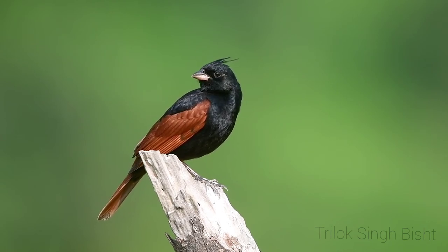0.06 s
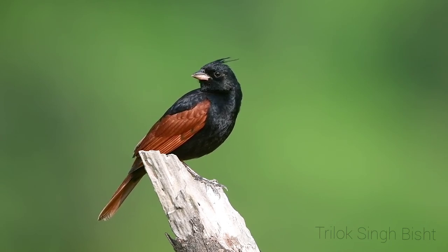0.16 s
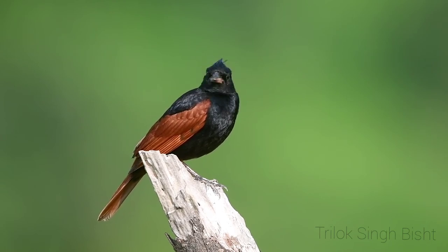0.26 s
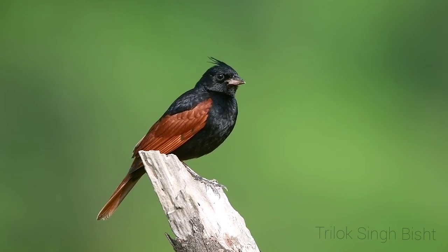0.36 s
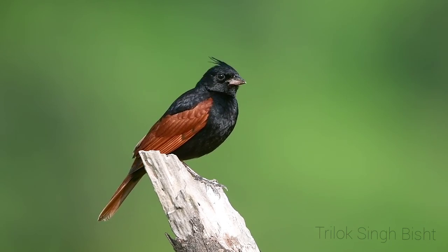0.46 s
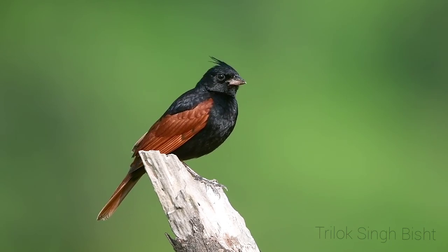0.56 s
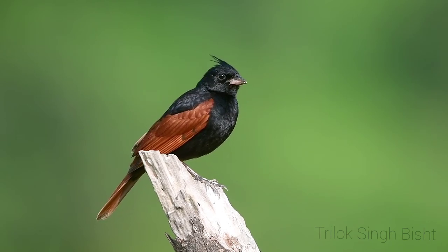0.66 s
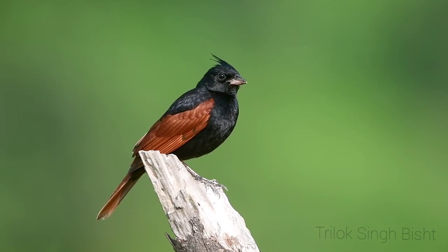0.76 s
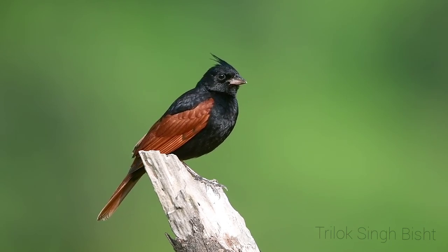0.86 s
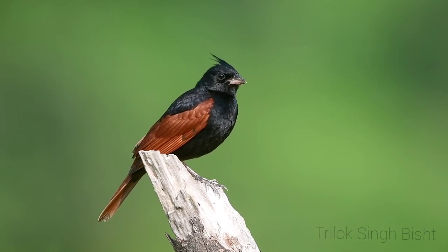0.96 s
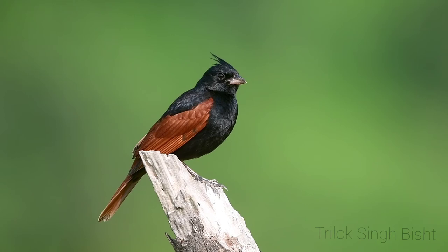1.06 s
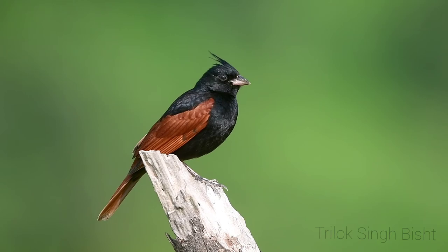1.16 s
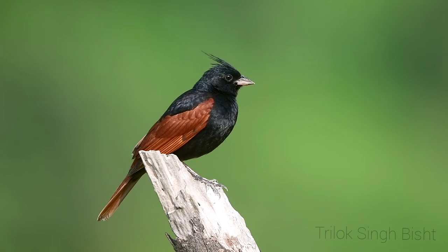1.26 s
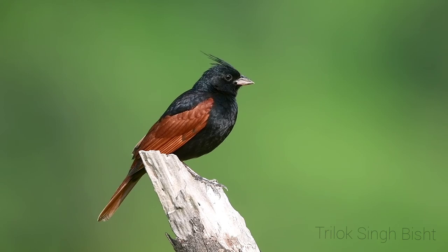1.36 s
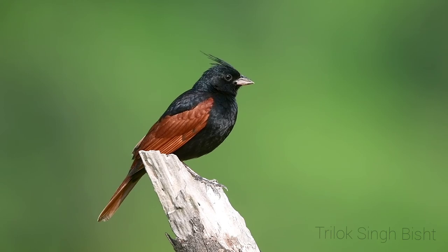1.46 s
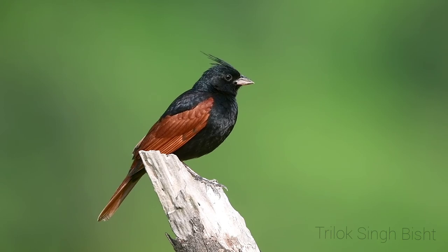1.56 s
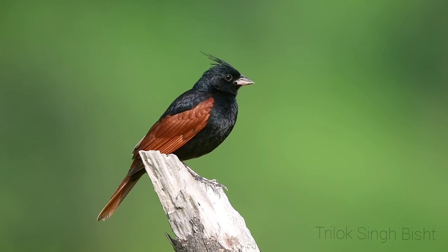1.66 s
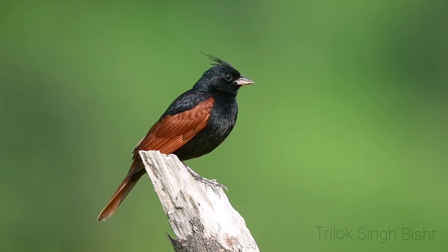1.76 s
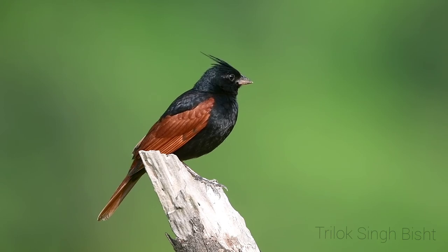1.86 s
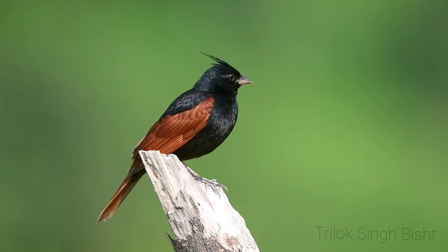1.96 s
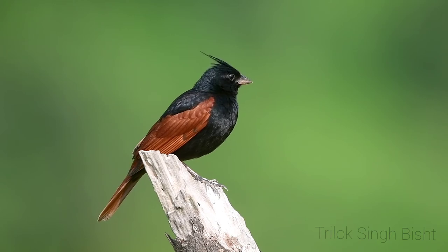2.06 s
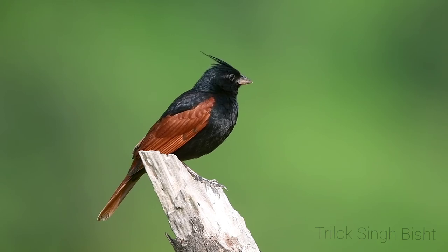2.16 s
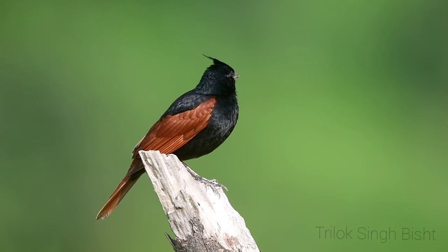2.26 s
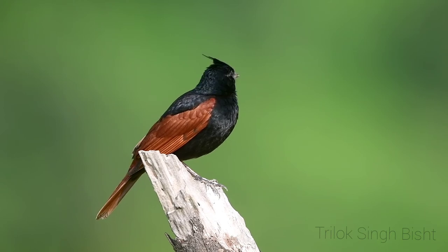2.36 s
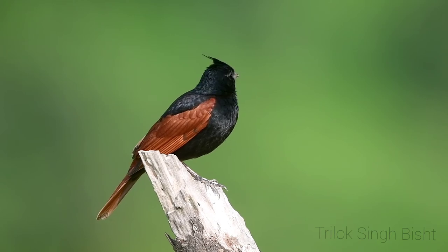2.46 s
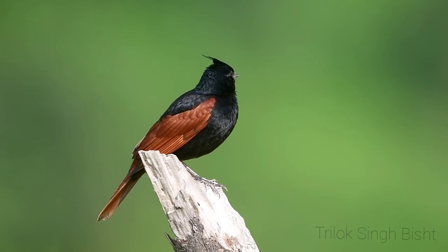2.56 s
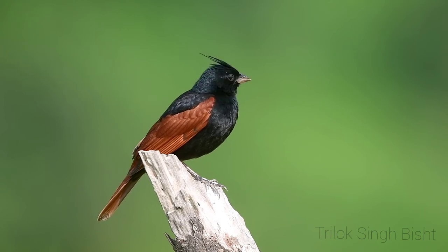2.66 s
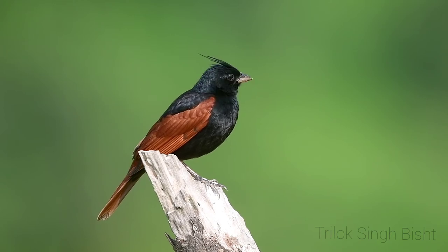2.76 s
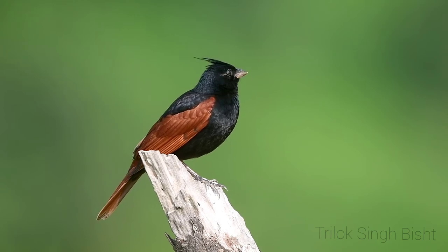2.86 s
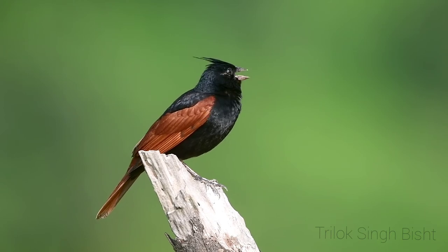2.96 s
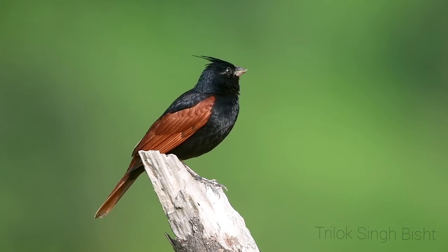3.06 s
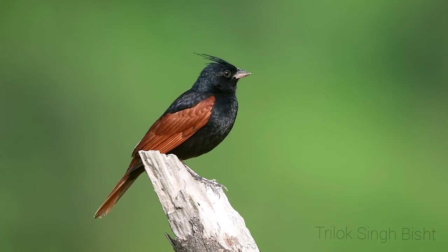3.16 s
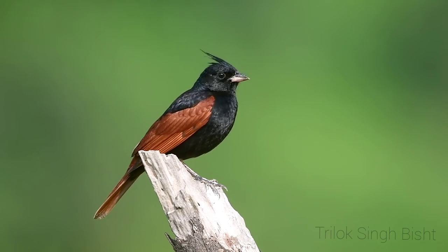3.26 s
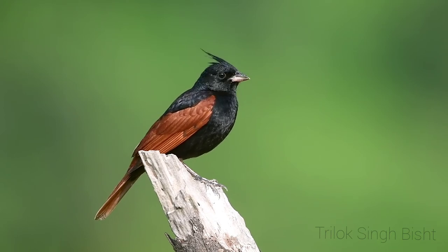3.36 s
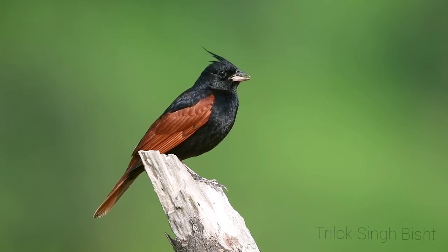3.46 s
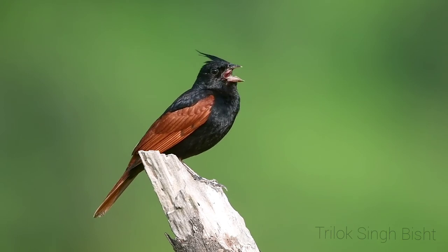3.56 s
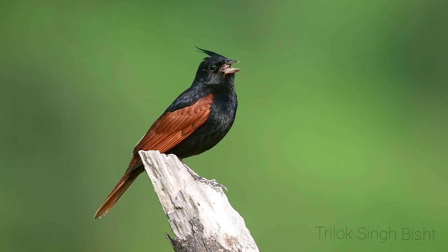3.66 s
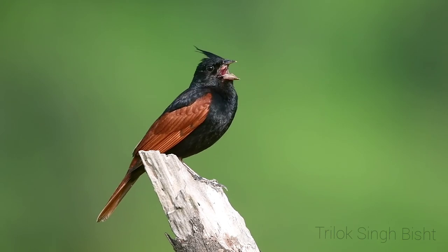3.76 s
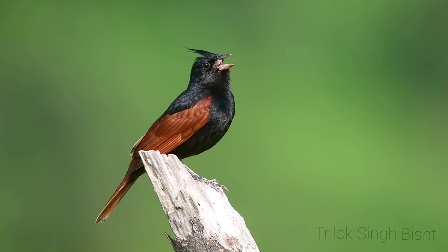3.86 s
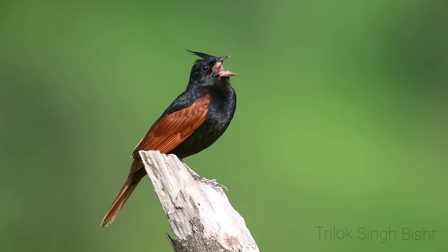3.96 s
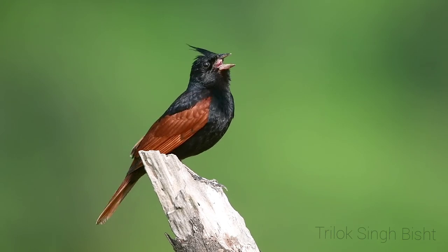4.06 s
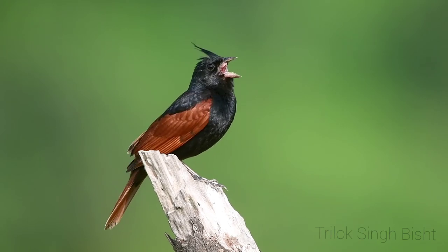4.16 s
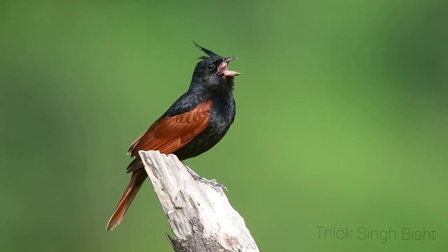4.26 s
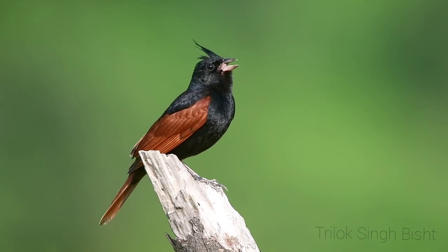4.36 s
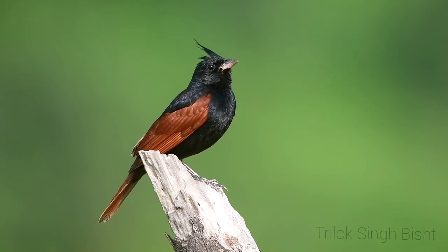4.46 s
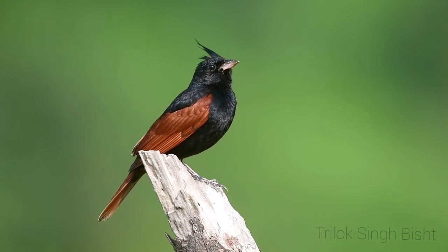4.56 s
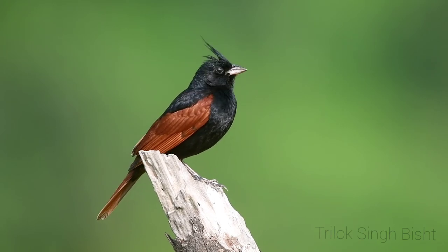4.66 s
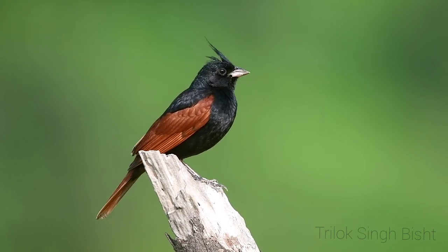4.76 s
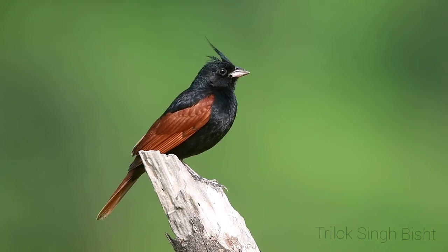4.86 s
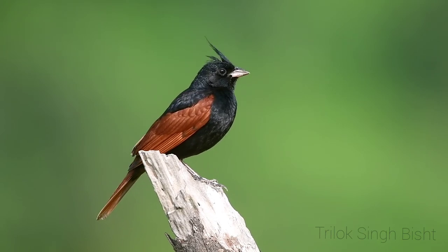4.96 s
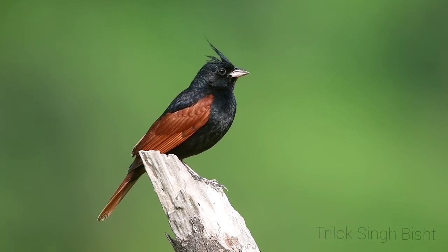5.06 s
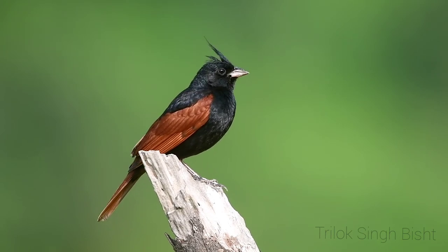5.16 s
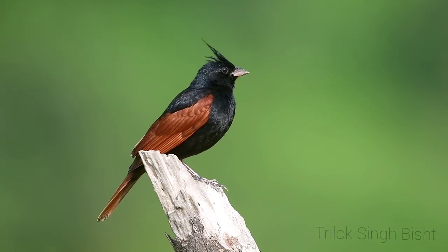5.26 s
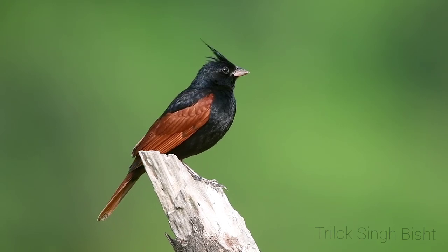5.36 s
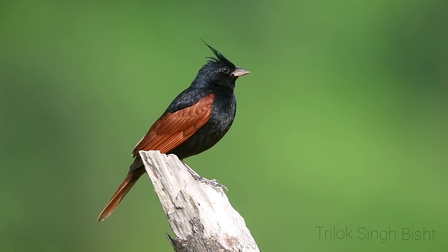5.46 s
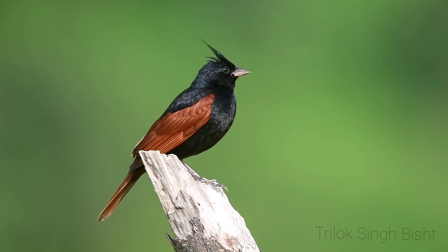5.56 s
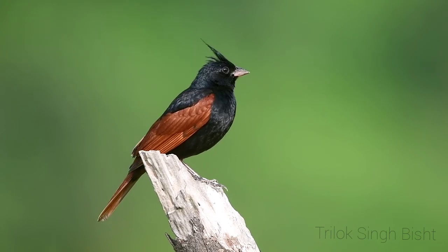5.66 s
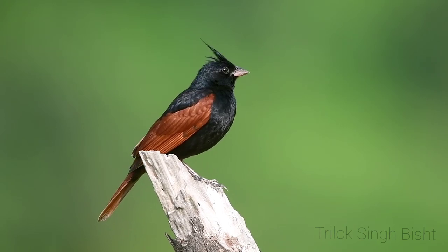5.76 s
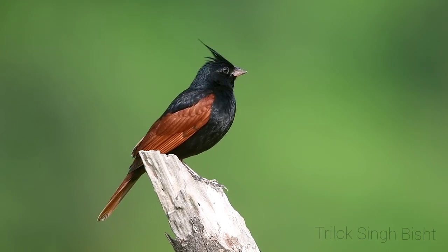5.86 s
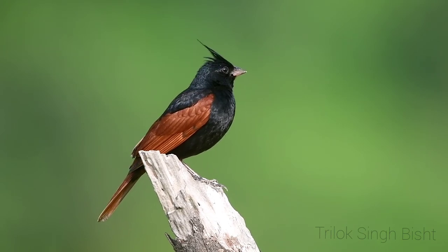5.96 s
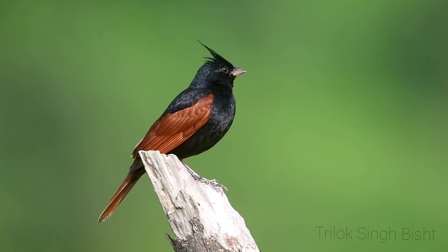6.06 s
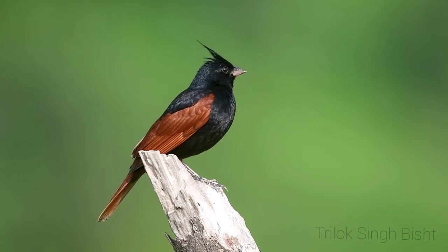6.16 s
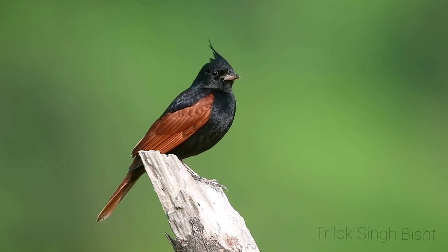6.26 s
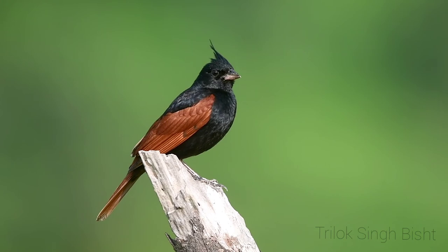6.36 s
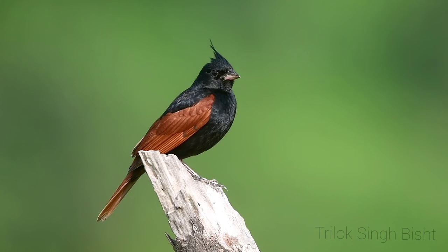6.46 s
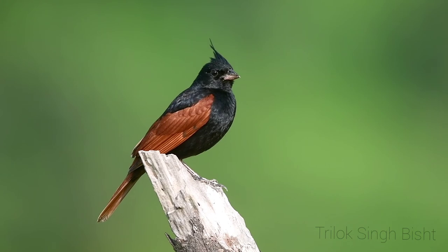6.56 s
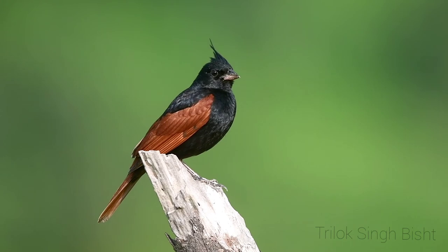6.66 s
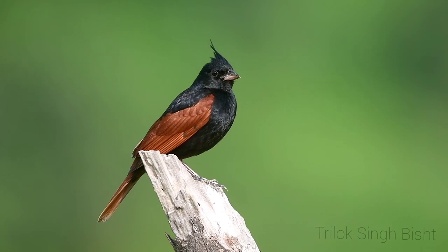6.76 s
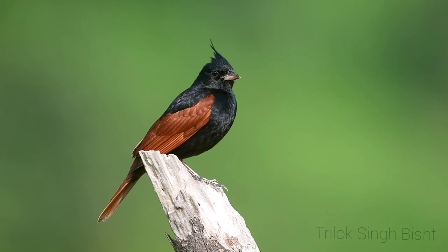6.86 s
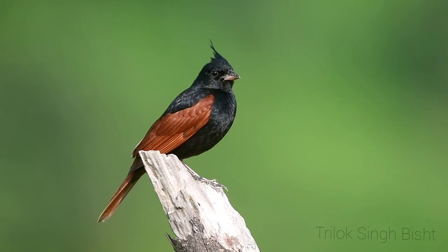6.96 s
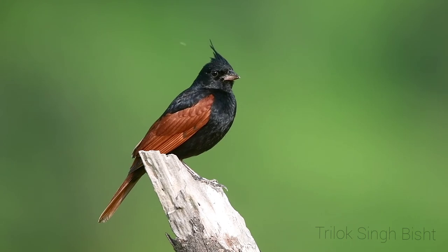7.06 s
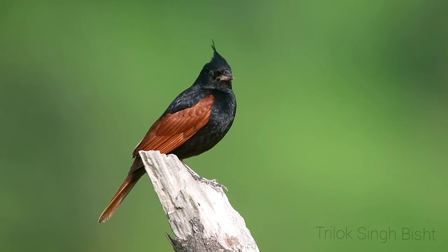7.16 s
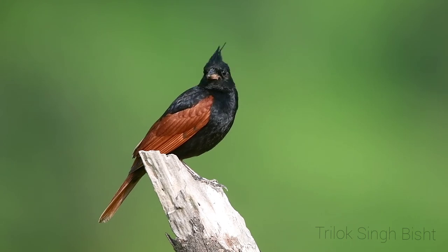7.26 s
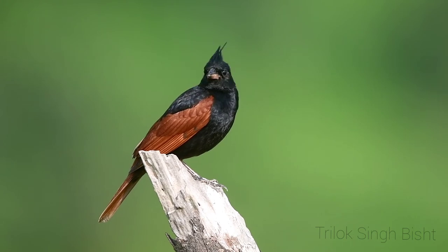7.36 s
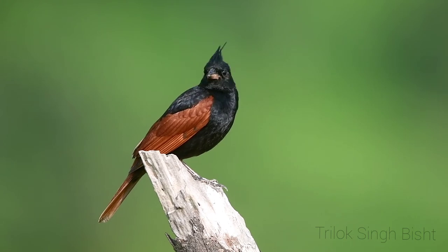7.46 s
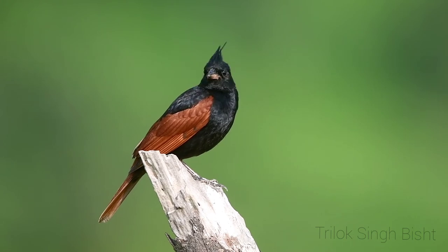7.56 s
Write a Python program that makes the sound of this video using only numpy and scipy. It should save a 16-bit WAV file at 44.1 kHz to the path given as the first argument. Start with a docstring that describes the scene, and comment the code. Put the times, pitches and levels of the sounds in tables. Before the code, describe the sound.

A small songbird sings a single phrase near the microphone midway through: a soft chip, three loud buzzing chips and a descending whistle, with a slight outdoor echo. Before and after it, far quieter birds twitter, whistle and rasp around the open countryside. Insects hiss steadily, with a thin high buzz at the start and end, and a faraway cow occasionally moos.

```python
"""A bunting sings close by on a hillside: one soft and three loud buzzing chips, then a long falling whistle.
It is all one gliding tone from the syrinx, which a fast pitch warble turns into the buzz.
Farther off, small birds call thin 'tsip' notes, twitter and scold, a bulbul whistles, another bird rasps,
and a cow lows now and then, its harmonics shaped by throat and mouth. Rock and trees scatter the calls,
over a soft hiss of insects and the low murmur of the valley."""
import sys
import numpy as np
from scipy import signal
from scipy.fft import rfft, irfft, next_fast_len
from scipy.io import wavfile
from scipy.ndimage import uniform_filter1d, map_coordinates

SR = 44100
rng = np.random.default_rng(int(sys.argv[2]) if len(sys.argv) > 2 else 0)


def log_audio(samples):
    """Write samples as a 16-bit WAV file to the path given in sys.argv[1]."""
    # one column per channel
    frames = np.atleast_2d(samples).T
    # limit to full scale, then quantise
    limited = np.clip(frames, -1, 1)
    pcm = np.round(limited * 32767).astype(np.int16)
    wavfile.write(sys.argv[1], SR, pcm)


N = 336042
T = np.arange(N) / SR
RELEASE_S, RELEASE_DROP_HZ = .011, 333  # every bunting note ends with a quick drop in pitch


def bunting(warble_hz=167, swing_hz=380, crest_db=5.5, bite_db=6, air_db=-47, beak_hz=14000, full_db=-8):
    """One syrinx: a fast pitch warble makes the buzz, which smooths out into pure falling glides."""
    # The chips. Each row: time of the upward flick, then buzz, glide and run lengths, all in seconds,
    # drive level in dB, buzz strength in dB.
    chip_notes = [(2.983, 0.029, 0.025, 0.048, -29, 1), (3.579, 0.041, .023, .055, -17, -5),
                  (3.8, .053, .031, .057, -10.5, -4.5), (4.008, 0.049, 0.041, 0.056, -11, 5.5)]
    # The closing whistle's contour. Each row: time in seconds, pitch in Hz, level in dB.
    contour = [(4.125, 5540, -34), (4.139, 5414, -17.5), (4.165, 5188, -6.5), (4.211, 4840, -12.5),
               (4.263, 4405, -12), (4.347, 3941, -23), (4.352, 3830, -34)]
    # The voice's partials. Each row: multiple of the pitch, relative level in dB.
    overtones = [(1, -0.5), (2, -47.5), (3, -42.5)]
    pitch, level_db = curves(contour)
    pitch = pitch - RELEASE_DROP_HZ * ramp(T, contour[-1][0] - RELEASE_S / 2, RELEASE_S)
    catch_db = 12 * bump(T, 4.174, .002)  # one brief catch near the whistle's loudest point
    whistle = amp(level_db - catch_db) * gate(T, contour[0][0], contour[-1][0])
    buzzing, chips = np.zeros(N), np.zeros(N)
    stumble, scatter = .35 * wobble(100), .01 * wobble(1500)
    for flick, buzz, glide, run, db, buzz_db in chip_notes:
        start, buzz_end, end = flick - glide - buzz, flick - glide, flick + run
        span, t = during(start, end)
        hz, shape_db = chip_gesture(t, flick, buzz, glide, run, buzz_db)
        buzzing[span] = np.clip((buzz_end - t) / .0044 + 1, 0, 1)
        warble = buzzing[span] * np.cos(2 * np.pi * warble_hz * (t - buzz_end) + stumble[span])
        pitch[span] = hz + swing_hz * warble
        # the tone weakens on each crest of the warble, where it leaves the throat's resonance
        chips[span] = amp(db + shape_db - crest_db * warble) * gate(t, start, end)
    # the membranes can swing only so far: soft chips stay peaky, loud ones level off
    flutter_db = wobble(170)
    chips = amp(full_db) * np.tanh(chips * amp(flutter_db - full_db))
    waver = 1 + .0016 * wobble(500) + buzzing * scatter
    phase = phase_of(uniform_filter1d(pitch, size=40) * waver)
    # the buzz drives the overtones harder than the pure glides do
    partials = sum(amp(db + bite_db * buzzing * (k > 1)) * np.sin(k * phase) for k, db in overtones)
    # the forced chips carry a little turbulence around their overtones
    air = amp(air_db) * noise([(8000, -21.5), (11500, -1.5), (13500, 1.5), (15500, -6.5)])[0]
    voice = np.sqrt(2) * (chips + whistle) * partials + chips * air
    return filtered(voice, lambda hz: 1 / np.sqrt(1 + (hz / beak_hz) ** 20))


def chip_gesture(t, flick, buzz, glide, run, buzz_db, flick_hz=6820, flick_s=.0027, accent_s=.0087):
    """Pitch and level of one chip: a swelling buzz, a glide, a flick upward and a falling run."""
    swell = ramp(t, flick - glide - buzz, buzz)
    release = ramp(t, flick + run - RELEASE_S, RELEASE_S)
    # the buzz sags a little as it swells, then the glide falls away
    opening_hz = 6420 - 299 * swell ** 2 - 1220 * ramp(t, flick - glide, glide)
    run_hz = 5606 - 2140 * ramp(t, flick, run) - RELEASE_DROP_HZ * release
    hz = np.where(t < flick, opening_hz, run_hz)
    hz = hz + (flick_hz - hz) / (1 + ((t - flick) / flick_s) ** 2)
    swell_db = (t < flick - glide) * (buzz_db - 5 - 25.5 * (1 - swell) ** 2)
    glide_push = bump(t, flick - glide + accent_s / 2, accent_s)
    run_push = bump(t, flick + accent_s / 2, accent_s / 2)
    gap = bump(t, flick - flick_s / 2, flick_s)  # the voice nearly stops while the pitch flicks up
    db = swell_db + 6 * (glide_push + run_push) - 26.5 * gap - 24.5 * release
    return hz, uniform_filter1d(db, size=80)


def scold(pulse_hz=245, pulse_db=5):
    """Short nasal notes: a rough tone from each side of the syrinx, both chopped by one uneven pulsing."""
    # Each row: start and length in seconds; pitch in Hz, level in dB and fade in dB per second for the
    # lower tone; the same three for the upper tone; pan in dB.
    notes = [(2.933, .12, 2227, -40.5, 229, 3010, -44, 60, -11.5),
             (7.066, 0.14, 1730, -54.5, 15, 2046, -58, -42, 12)]
    pulse_phase = phase_of(pulse_hz * (1 + .16 * wobble(200)))
    pulsing = unit(amp(pulse_db * np.cos(pulse_phase)))
    out, tremor = np.zeros((2, N)), 1 + .038 * wobble(450) + .022 * wobble(45)
    for s, length, lower_hz, lower_db, lower_fade, upper_hz, upper_db, upper_fade, left_db in notes:
        span, t = during(s, s + length)
        lower = amp(lower_db - lower_fade * (t - s)) * tone(lower_hz * tremor[span])
        upper = amp(upper_db - upper_fade * (t - s)) * tone(upper_hz * tremor[span])
        out[:, span] += pan(gate(t, s, s + length) * (lower + upper), left_db)
    return out * pulsing


def tsips(centre_hz=5550, fall_hz_per_s=24500, half_s=.023, bend=.45, trim_db=-3):
    """Contact calls of a small flock, in even bouts: each a quick slide that steepens as it falls."""
    # Each row: middle of the first call in seconds, number of calls, spacing in seconds, relative dB.
    bouts = [(.165, 2, 0.083, -54.5), (1.055, 4, 0.097, -46.5), (1.546, 2, 0.088, -48),
             (1.875, 2, 0.11, -48.5), (3.158, 4, 0.089, -46), (4.842, 2, .093, -48.5),
             (5.358, 5, .086, -47.5), (6.503, 2, .096, -49), (7.132, 2, 0.087, -48.5),
             (7.466, 2, .095, -45)]
    out, shake = np.zeros(N), 1 + .016 * wobble(330) + .008 * wobble(25)
    for first, count, spacing, db in bouts:
        for middle in first + spacing * np.arange(count):
            span, t = during(middle - half_s, middle + half_s)
            position = np.clip((t - middle) / half_s, -1, 1)
            hz = centre_hz - fall_hz_per_s * (t - middle) * (1 + bend * position)
            swell = np.cos(np.pi / 2 * position) ** 2
            gain = amp(db + trim_db + rng.standard_normal())
            out[span] += gain * swell * np.sin(phase_of(hz * shake[span]))
    return pan(out, -6) + near_echoes(out, left_db=-7.5, right_db=-2, fade_s=.027)


def bulbul(climb_hz=260, leap_s=.024, slide_hz_per_s=2700, fade_db=9.5):
    """Whistled notes that swell onto a shelf of pitch, leap up and slide down."""
    # Each row: time of the leap and shelf length in seconds, shelf pitch in Hz, shelf level in dB,
    # top pitch in Hz, slide length in seconds, slide level in dB.
    notes = [(1.951, 0.03, 1730, -60, 2496, 0.25, -57), (2.437, 0.035, 1730, -59, 2506, 0.26, -58.5),
             (5.758, 0.088, 2057, -48.5, 2450, 0.045, -56), (5.924, 0.073, 1982, -43, 2524, 0.049, -51),
             (6.105, .075, 2040, -44, 2430, 0.039, -56), (7.332, 0.038, 1771, -44, 2216, 0.085, -46.5)]
    out, tremor = np.zeros(N), 1 + .014 * wobble(450)
    for leap, shelf, shelf_hz, shelf_db, top_hz, slide, slide_db in notes:
        span, t = during(leap - shelf, leap + slide)
        below = (1 - ramp(t, leap - shelf, shelf)) ** 3
        up = ramp(t, leap - leap_s / 2, leap_s)
        slide_ends = (2 * ramp(t, leap, slide) - 1) ** 2
        hz = (1 - up) * (shelf_hz - climb_hz * below) + up * (top_hz - slide_hz_per_s * (t - leap))
        db = (1 - up) * (shelf_db - 2 * fade_db * below) + up * (slide_db - fade_db * slide_ends)
        out[span] += amp(db) * gate(t, leap - shelf, leap + slide) * tone(hz * tremor[span])
    return out


def rasps(rattle_hz=95, rattle_db=3):
    """A hoarse bird: bursts of rattling noise."""
    # The harsh calls. Each row: start in seconds, length in seconds, level in dB.
    calls = [(4.614, 0.23, -52.5), (5.097, 0.15, -49), (5.277, 0.064, -48), (5.42, 0.16, -52.5),
             (5.74, 0.13, -48.5), (5.942, 0.2, -49.5), (7.058, 0.16, -57.5)]
    # Their tone colour. Each row: frequency in Hz, relative level in dB.
    colour = [(2000, -21), (2750, -7), (3000, -7.5), (3500, -6), (4100, 1.5), (4500, -3.5), (5000, 5.5),
              (5700, 0.5), (6400, -12), (7500, -21), (10000, -54)]
    envelope = sum(amp(db) * gate(T, s, s + length, edge_s=.067) for s, length, db in calls)
    rattle = amp(rattle_db * np.sin(phase_of(rattle_hz * (1 + .067 * wobble(40)))))
    return envelope * unit(rattle * patchy(noise(colour), depth_db=3.5))


def twitter():
    """Small birds and a few plain bulbul notes: short, straight slurs roughened by a quick pitch tremor."""
    # Each row: start and length in seconds, first and last pitch in Hz, level in dB, pan in dB.
    slurs = [(.02, 0.046, 2150, 2030, -62.5, -16), (0.102, .055, 2070, 1880, -68, -14),
             (0.178, .06, 3520, 3050, -70, -10), (0.341, 0.05, 3900, 3000, -70, -19),
             (.585, .04, 4860, 4440, -62, -13), (1.196, 0.045, 3330, 3880, -62, -3),
             (1.288, 0.067, 4580, 4330, -58, 0), (1.415, 0.031, 3940, 4100, -61, -1),
             (4.64, 0.16, 2940, 3200, -66, 18), (4.657, .13, 4010, 4200, -58.5, 2),
             (7.259, 0.027, 1965, 2030, -49.5, 12.5), (7.277, 0.04, 2950, 3460, -59.5, -3),
             (7.51, .045, 3750, 3500, -67, -7)]
    out, tremor = np.zeros((2, N)), 1 + .04 * wobble(450)
    for s, length, start_hz, end_hz, db, left_db in slurs:
        span, t = during(s, s + length)
        hz = start_hz + (end_hz - start_hz) * ramp(t, s, length)
        envelope = amp(db) * gate(t, s, s + length, edge_s=.024)
        out[:, span] += pan(envelope * tone(hz * tremor[span]), left_db)
    return out


def cow(jitter=.053, closing_db=70, drift_db=3.5, throb_db=3, slack_db=7, strain_db=4):
    """Each low rises, holds and breaks hoarse as it falls; only its middle harmonics carry this far."""
    # Each row: time of the break and lengths before and after it in seconds, level in dB, pushes in the
    # rise and the fall in dB, mouth resonance as a multiple of the rising pitch, held resonance in Hz.
    lows = [(0.0, 0.6, .1, -62, 0, 1, 5, 1400), (2.72, 0.8, .16, -62.5, 3, 8.5, 6, 1050),
            (3.63, .27, .07, -66.5, 3.5, -0.5, 3, 900), (5.532, 0.75, .52, -57, 5.5, 6.5, 5, 1380)]
    # The throat's tone colour. Each row: frequency in Hz, relative level in dB.
    throat = [(300, -38.5), (700, -13), (1020, -5), (1330, -8.5), (1700, -15), (2070, 2), (2450, -5.5),
              (3100, -12), (4500, -36)]
    out, shake, tremor = np.zeros(N), wobble(160), wobble(70)
    harmonics = np.arange(2, 11)[:, None]
    for crack, before, after, db, rise_db, fall_db, rise_ratio, held_hz in lows:
        start, end = crack - before, crack + after
        span, t = during(start, end)
        hz, hoarse, mouth, mouth_hz, fall, envelope = moo_shape(t, start, crack, end, held_hz, rise_ratio)
        # the voice pushes early in the rise, slackens before the hold and pushes again in the fall
        effort_db = rise_db * bump(t - start, .11, .04) - slack_db * bump(t - start, .22, .097)
        effort_db += fall_db * bump(fall, 2 / 3, 1 / 4) + strain_db * hoarse
        phase = phase_of(hz * (1 + jitter * hoarse * shake[span]))
        # a closing mouth leaves a single resonance
        octaves_off = np.abs(np.log2(harmonics * hz / mouth_hz))
        colour = amp(along(throat, harmonics * hz) - closing_db * (1 - mouth) * octaves_off)
        weight = colour / np.linalg.norm(colour, axis=0)
        # moving air makes each harmonic fade in and out on the way
        drift = signal.resample(rng.standard_normal((len(harmonics), 22)), len(hz), axis=1)
        voice = np.sqrt(2) * np.sum(weight * amp(drift_db * drift) * np.sin(harmonics * phase), axis=0)
        throb = amp(throb_db * np.sqrt(hoarse) * tremor[span])
        out[span] += amp(db + effort_db) * envelope * throb * voice
    return out


def moo_shape(t, start, crack, end, held_hz, rise_ratio, low_hz=186, top_hz=345.5, rise_s=.34):
    """One low's pitch, hoarseness, mouth opening and resonance, progress of the fall, and envelope."""
    rise, fall = ramp(t, start, rise_s), ramp(t, crack, end - crack)
    sag_hz = 35 * np.maximum(t - start - rise_s, 0)
    clear_hz = low_hz + (top_hz - low_hz) * np.sin(np.pi / 2 * rise) - sag_hz
    broken_hz = 350 - 88.6 * fall ** 2
    hz = np.where(t < crack, clear_hz, broken_hz)
    hoarse = .093 + .6 * gate(t, crack, crack + .28, edge_s=.03)
    mouth = .82 * rise ** 2 * (1 - fall) ** 2
    # the mouth's resonance climbs with the pitch, settles for the hold and sinks in the fall
    climbing_hz = rise_ratio * hz
    settling_hz = climbing_hz + (held_hz - climbing_hz) * rise ** 5
    mouth_hz = np.where(t < crack, settling_hz, 1567 * (1 - .22 * fall))
    envelope = ramp(t, start, .1) ** 2 * (1 - ramp(t, end - .063, .063))
    return hz, hoarse, mouth, mouth_hz, fall, envelope


def insects(trill_hz=5650, pulse_hz=65):
    """A broad hiss of far insects, a high narrow buzz that sags and drops away, and one short trill."""
    # The hiss's tone colour. Each row: frequency in Hz, relative noise density in dB.
    colour = [(1500, -26.5), (2700, -13), (3500, -9), (4500, -4), (5500, 3), (6300, -4), (7200, -11.5),
              (8500, -17), (12000, -19.5), (15700, -27)]
    # The high buzzes. Each row: start and end in seconds, first and last pitch in Hz, level in dB.
    buzzes = [(0, 1.1, 7200, 7060, -69), (5.695, 7.707, 7430, 7100, -74)]
    chorus_db = -57.5 + 3.5 * bump(T, 4, 1) + .44 * wobble(11)  # the chorus swells once
    hiss = amp(chorus_db) * patchy(noise(colour), depth_db=1.55)
    buzz, waver_hz = np.zeros(N), 60 * wobble(300)
    for start, end, start_hz, end_hz, db in buzzes:
        hz = np.interp(T, [start, end], [start_hz, end_hz]) + waver_hz
        buzz += amp(db) * gate(T, start, end, edge_s=.04) * tone(hz)
    pulses = (1 + np.sin(2 * np.pi * pulse_hz * T)) * np.sin(phase_of(trill_hz + 260 * wobble(830)))
    trill = amp(-58) * unit(pulses) * gate(T, .83, .99, edge_s=.36)
    return pan(hiss, -2) + pan(buzz, -8) + pan(trill, -2)


def valley(level_db=-62):
    """Low outdoor murmur, alike in both ears in the bass and wider above."""
    # The murmur's tone colour. Each row: frequency in Hz, relative noise density in dB.
    colour = [(15, -50), (25, -21.5), (60, -13.5), (125, -5.5), (150, -6.5), (180, -2), (225, -6),
              (400, -10.5), (475, 0), (530, -9.5), (620, -4), (870, -12), (1900, -13), (2500, -21),
              (3300, -54.5)]
    # Its stereo image. Each row: frequency in Hz, left-right likeness from 0 to 1.
    likeness = [(190, 1), (350, 1), (620, .84), (1120, 0.52), (2000, 0.088)]
    width = lambda hz: np.arccos(along(likeness, hz)) / 2
    mid, side = filtered(noise(colour), lambda hz: np.array([np.cos(width(hz)), np.sin(width(hz))]))
    return amp(level_db + .2 * wobble(1)) * unit(np.array([mid + side, mid - side]))


def near_echoes(x, left_db=-20, right_db=-13, fade_s=.021):
    """Rock and ground close by return a spray of weak copies that ripple every glide."""
    t = np.arange(SR // 25) / SR
    spray = rng.standard_normal((2, len(t))) * np.exp(-t / fade_s) * (t > .001)
    spray *= amp([[left_db], [right_db]]) / np.linalg.norm(spray, axis=1, keepdims=True)
    return signal.fftconvolve(x[None], spray, axes=1)[:, :N]


def trees(x):
    """The wooded slope scatters a long tail that darkens as it fades."""
    # Each row: frequency in Hz, seconds the tail takes to fall by 60 dB.
    decay = [(1000, 3.4), (4500, 1.5), (7000, 1.0), (14000, 0.37)]
    hz, t, spectrum = signal.stft(rng.standard_normal((2, SR * 2)), SR, nperseg=256)
    tail = signal.istft(spectrum * amp(-60 * t / along(decay, hz)[:, None]), SR, nperseg=256)[1]
    return signal.fftconvolve(x[None], tail / np.linalg.norm(tail[0]), axes=1)[:, :N]


def amp(db):
    """Decibels to gain."""
    return 10 ** (np.asarray(db) / 20)


def unit(x):
    """Scale to rms 1."""
    return x / np.sqrt(np.mean(x ** 2) + 1e-20)


def along(points, hz):
    """(Hz, value) points read on a log axis."""
    freqs, values = np.transpose(points)
    return np.interp(np.log(hz + 1), np.log(freqs + 1), values)


def curves(rows):
    """Straight-line curves through each column after the first, which holds the times."""
    times, *columns = np.transpose(rows)
    return [np.interp(T, times, column) for column in columns]


def during(start, end):
    """The samples of an event, with a small margin, and their times."""
    span = slice(max(0, int((start - .01) * SR)), int((end + .01) * SR))
    return span, T[span]


def gate(t, start, end, edge_s=.0063):
    """Fade in around start and out around end."""
    return np.clip(np.minimum(t - start, end - t) / edge_s + .5, 0, 1)


def ramp(t, start, length):
    """0 before start, rising straight to 1 over length."""
    return np.clip((t - start) / length, 0, 1)


def bump(t, centre, width):
    """A bell curve of height 1."""
    return np.exp(-((t - centre) / width) ** 2)


def wobble(rate):
    """A smooth random curve, rate knots a second."""
    return map_coordinates(rng.standard_normal(int(N * rate / SR) + 4), [T * rate])


def phase_of(hz):
    """Running phase of a pitch curve."""
    return 2 * np.pi * np.cumsum(hz) / SR


def tone(hz):
    """A sine of rms 1 on a pitch curve."""
    return np.sqrt(2) * np.sin(phase_of(hz))


def filtered(x, response):
    """Shape x by a frequency response."""
    size = next_fast_len(N + 8192)
    return irfft(rfft(x, size) * response(np.fft.rfftfreq(size, 1 / SR)), size)[..., :N]


def noise(colour):
    """Two unrelated coloured noises of rms 1."""
    return unit(filtered(rng.standard_normal((2, N)), lambda hz: amp(along(colour, hz))))


def patchy(x, depth_db):
    """Random swells, each a few hundred Hz wide and a tenth of a second long."""
    spectrum = signal.stft(x, nperseg=512)[2]
    swells = uniform_filter1d(rng.standard_normal(spectrum.shape[1:]), size=6, axis=0)
    swells = unit(uniform_filter1d(swells, size=16, axis=1))
    return unit(signal.istft(spectrum * amp(depth_db * swells), nperseg=512)[1][:, :N])


def pan(x, left_db, lead_s=0):
    """Place a sound by how much louder and earlier it is on the left than on the right."""
    ears = np.array([[.5], [-.5]])
    if lead_s:
        x = filtered(x, lambda hz: np.exp(2j * np.pi * hz * ears * lead_s))
    return amp(ears * left_db) * x


def scene():
    """The near singer, its neighbours and the hillside."""
    # The bunting turns its head. Each row: time in seconds, pan in dB.
    head_turn = [(3.95, -1.5), (4.15, -0.6)]
    song = bunting()
    near = pan(song, curves(head_turn)[0], lead_s=-.000023)
    near += near_echoes(song) + amp(-33.5) * trees(song)
    whistles = bulbul()
    answer = T > 6.6  # the last bulbul note comes from the left, the earlier ones from the right
    far = pan(whistles * ~answer, -9, lead_s=-.00011) + pan(whistles * answer, 6.9, lead_s=.00021)
    far += tsips() + twitter() + pan(rasps(), -.78)
    far += pan(cow(), -4.5, lead_s=-.00013)
    return near + scold() + far + amp(-18) * trees(far.mean(axis=0)) + insects() + valley()


def record(dry, top_hz=15720):
    """Two narrow dips colour the sound, and nothing passes above the band limit."""
    # The microphone's dips. Each row: centre in Hz, width in Hz, gain in dB.
    dips = [(2603, 77, -15.5), (7720, 217, -23.5)]
    dip_db = lambda hz: sum(db * bump(hz, centre, np.sqrt(2) * width) for centre, width, db in dips)
    return filtered(dry, lambda hz: amp(dip_db(hz)) * (hz < top_hz))


dry = scene()
out = record(dry)
log_audio(out)
```